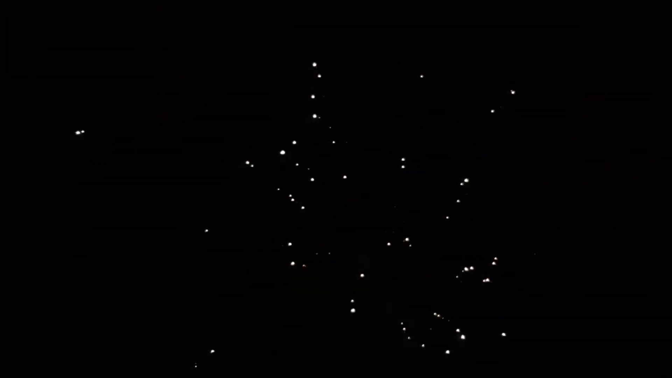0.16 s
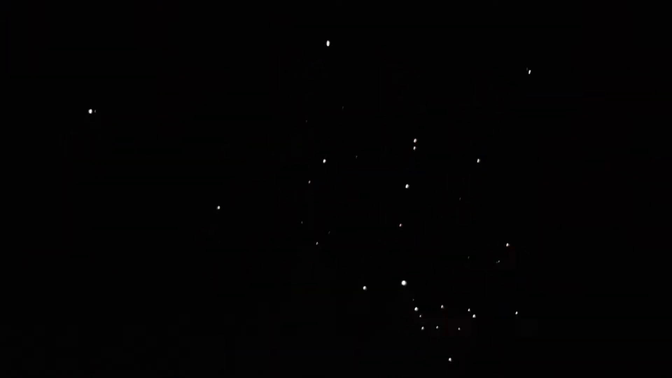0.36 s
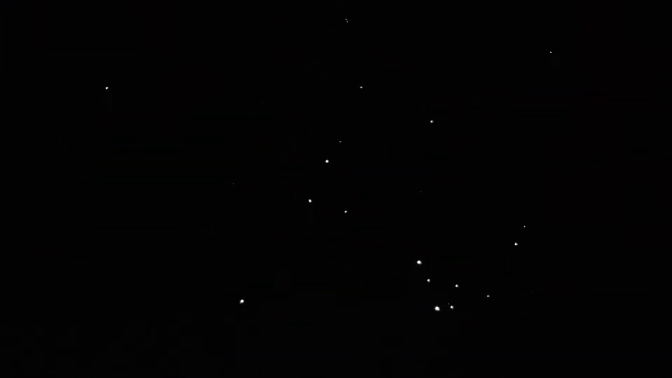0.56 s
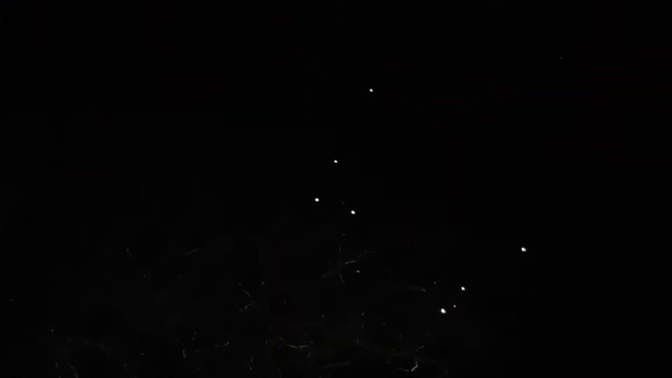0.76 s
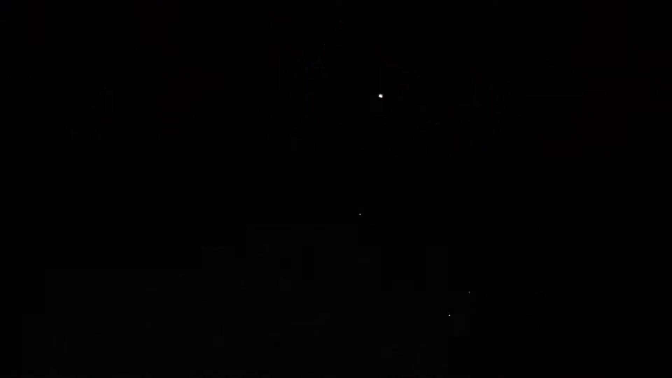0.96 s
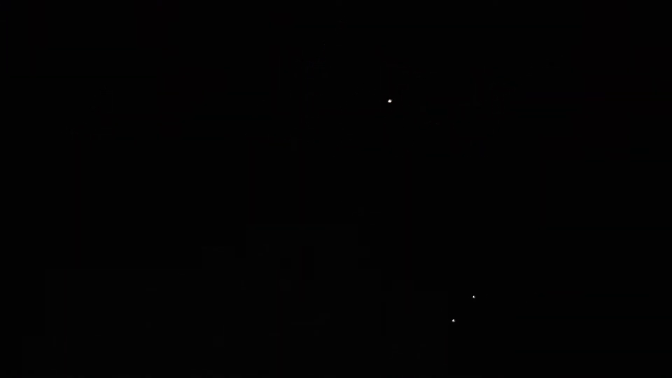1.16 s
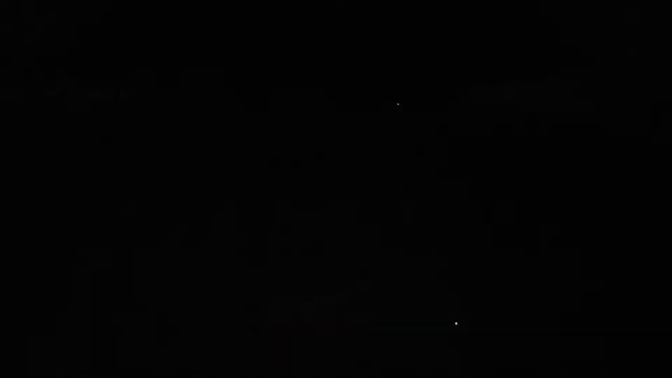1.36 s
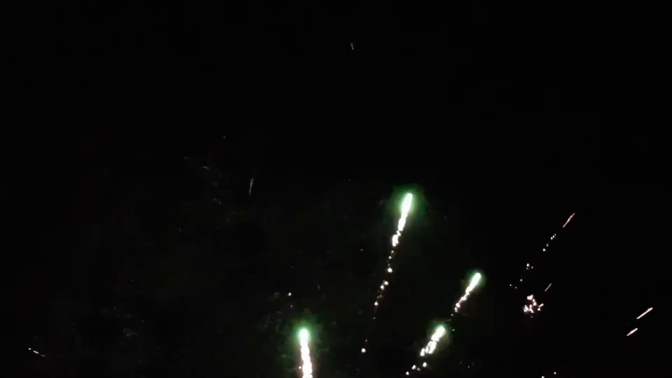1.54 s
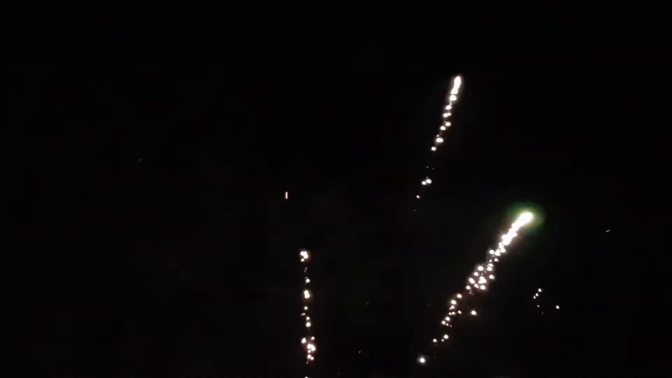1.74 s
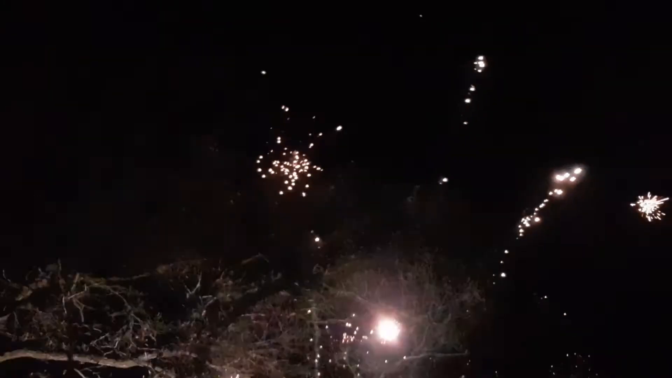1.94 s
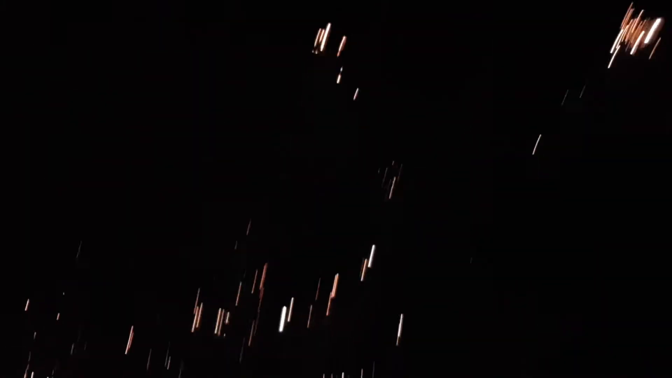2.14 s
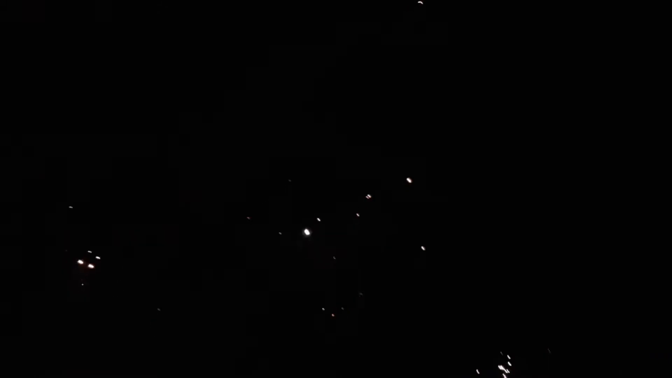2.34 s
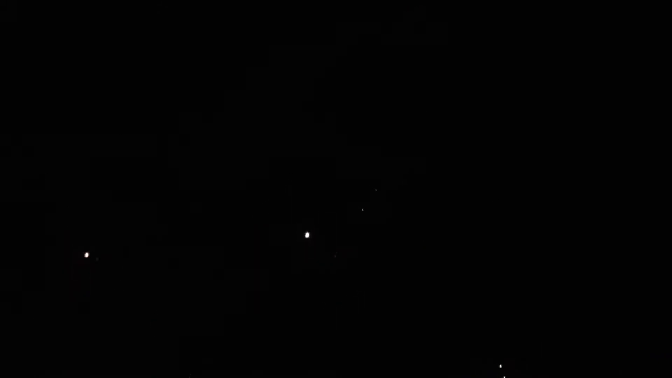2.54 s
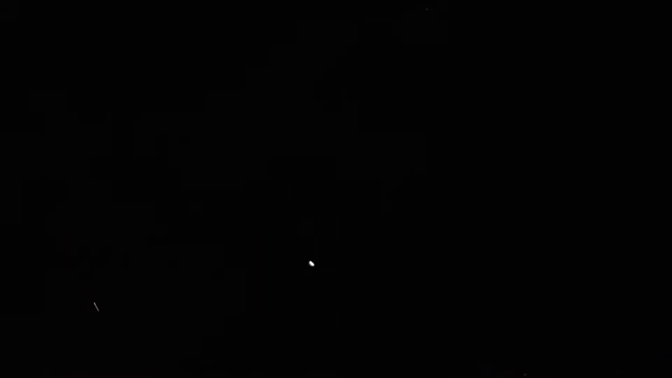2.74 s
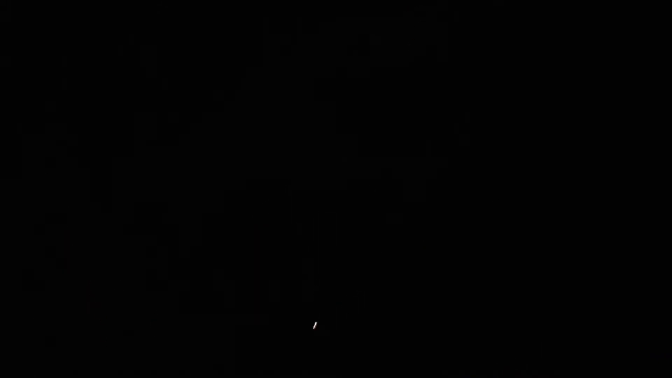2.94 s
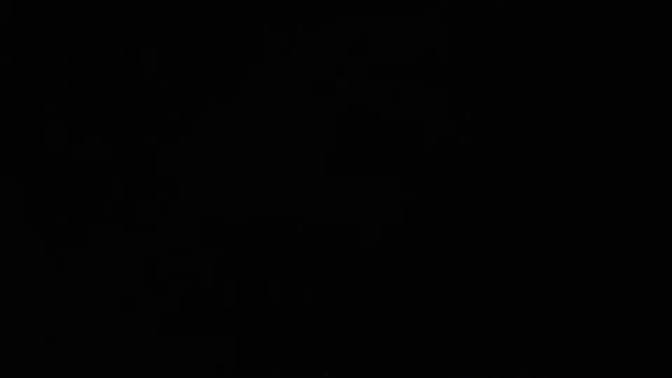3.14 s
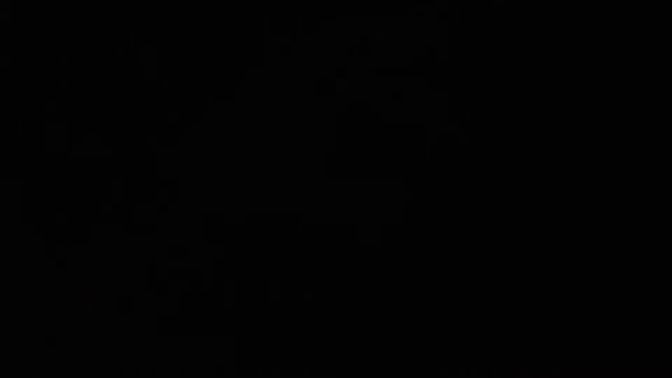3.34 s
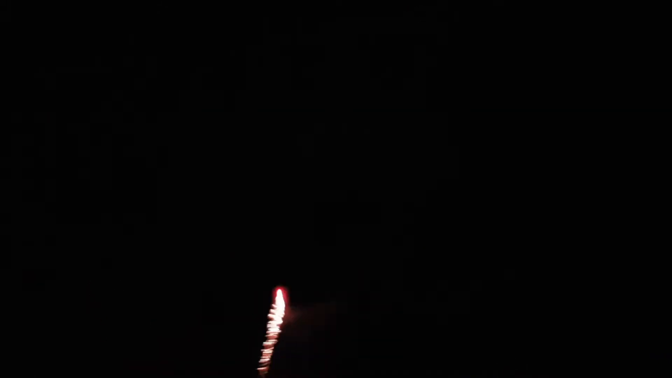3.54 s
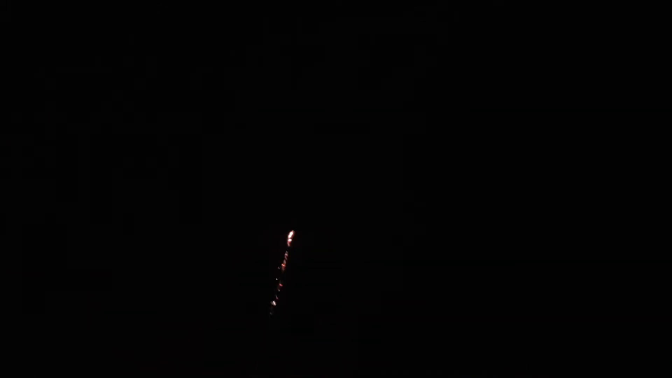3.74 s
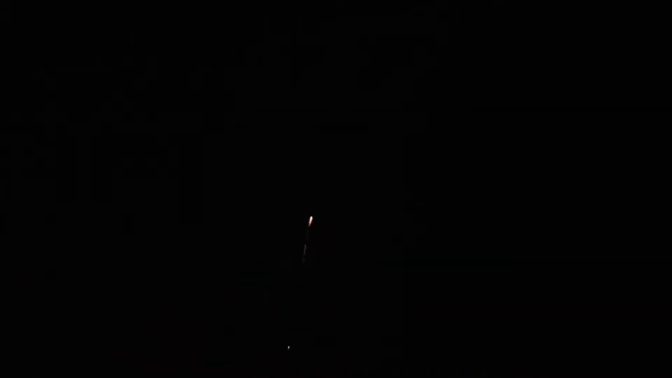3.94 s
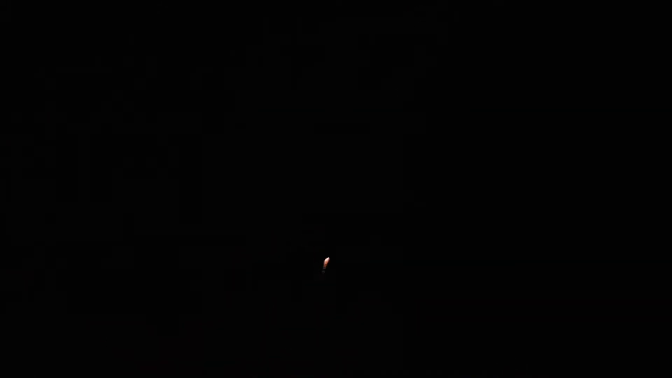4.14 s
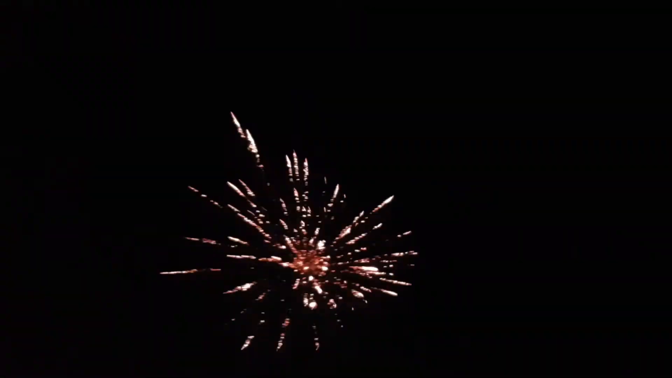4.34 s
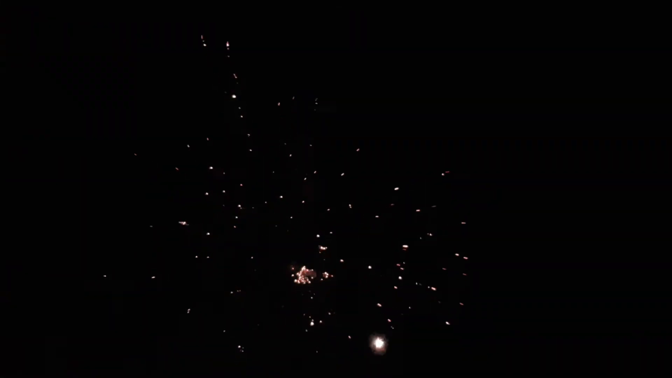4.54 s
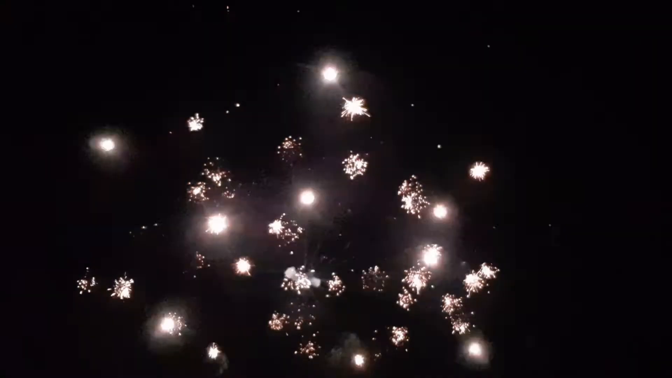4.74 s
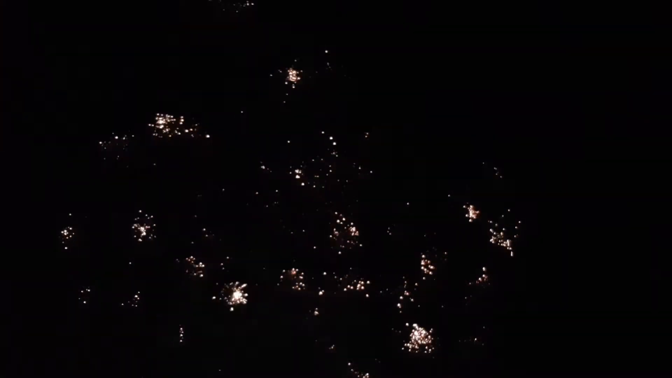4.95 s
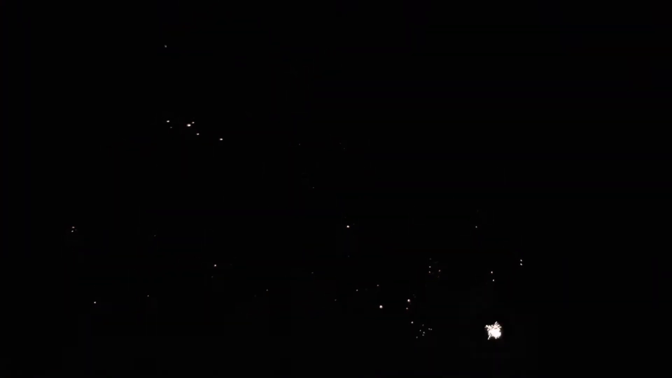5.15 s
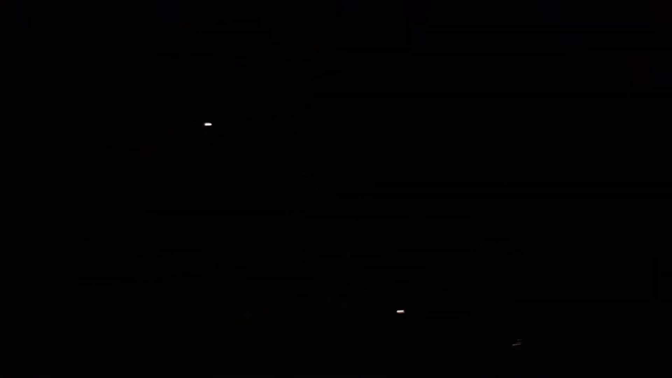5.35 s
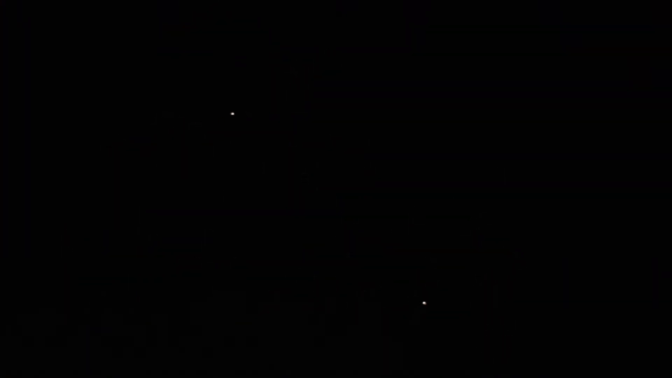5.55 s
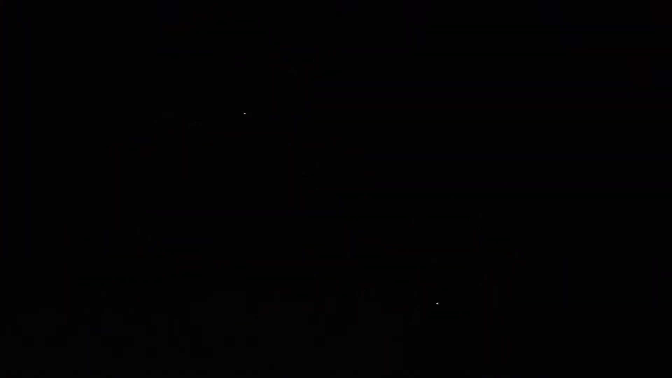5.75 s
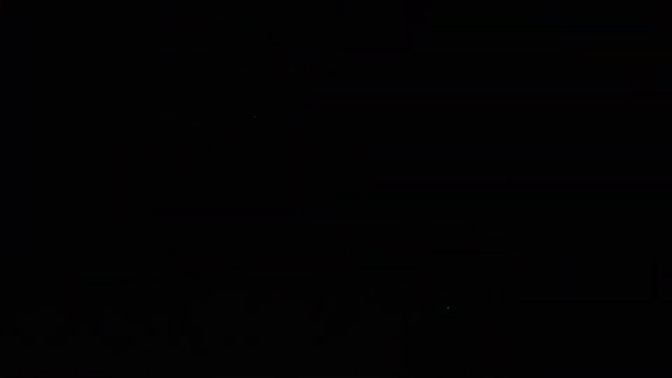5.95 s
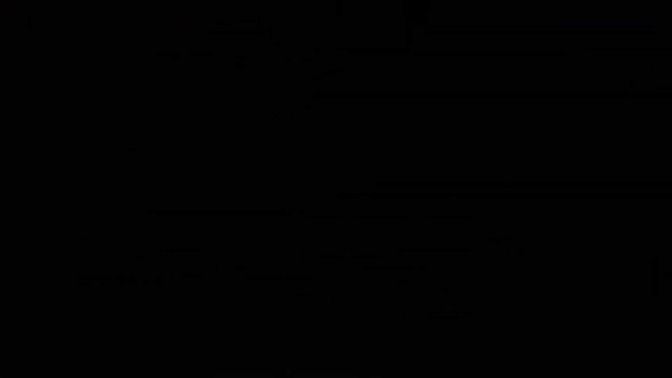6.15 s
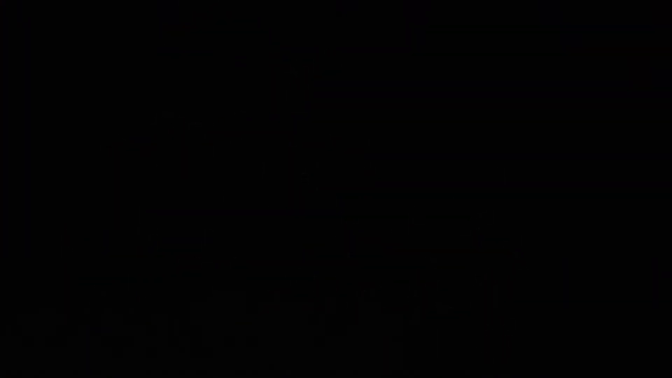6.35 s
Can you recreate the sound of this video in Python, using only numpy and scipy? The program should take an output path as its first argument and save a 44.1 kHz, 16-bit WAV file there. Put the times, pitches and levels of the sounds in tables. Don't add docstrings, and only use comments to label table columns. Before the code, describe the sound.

At night outdoors, launch thumps lead to two huge firework bangs, each followed by a burst of crackling stars, then another launch crack.

```python
import sys
import numpy as np
from scipy import signal
from scipy.fft import rfft, irfft
from scipy.io import wavfile
from scipy.ndimage import uniform_filter1d

SR = 44100
rng = np.random.default_rng(int(sys.argv[2]) if len(sys.argv) > 2 else 0)


def generate_wav(signal):
    frames = np.transpose(np.atleast_2d(signal))
    scaled = np.clip(frames, -1, 1) * 32767
    pcm = np.round(scaled).astype(np.int16)
    wavfile.write(sys.argv[1], SR, pcm)


def invert_db(x):
    u = np.asarray(x, float) / 20
    return 10 ** u


N = 282240


def unit(x):
    return x / np.sqrt(np.mean(x ** 2) + 1e-20)


def along(points, hz):
    f, value = np.transpose(points)
    return np.interp(np.log(hz + 1), np.log(f + 1), value)


def level_curve(rows, t, fade_db):
    s, db = np.transpose(rows)
    after_end = np.clip(t - s[-1], 0, None)
    return np.where(t < s[0], -200, np.interp(t, s, db) - fade_db * after_end)


def add(out, s, x):
    i = round(s * SR)
    out[..., i:i + x.shape[-1]] += x[..., :N - i]


# (frequency [Hz], left-right likeness [-1 to 1])
LIKENESS = [(60, 1), (130, 0.96), (290, 0.85), (640, 0.51), (1410, -0.15), (3100, -0.011), (6820, 0.021),
            (15000, 0.94)]
# (frequency [Hz], left over right [dB])
SIDE_LEAN = [(60, 4), (110, -2), (200, 2.0), (380, 1.5), (700, 4.5), (1290, 0.5), (2380, -4), (4400, -3),
             (8120, 2), (15000, -8.5)]


def rush(spectrum, size, patchy_db, loss=None):
    hz, t, z = signal.stft(rng.standard_normal((2, size)), SR, nperseg=512)
    patches = uniform_filter1d(rng.standard_normal(z.shape[1:]), size=8, axis=0)
    patches = uniform_filter1d(patches, size=4, axis=1)
    turn = np.arccos(np.clip(along(LIKENESS, hz), -1, 1))[:, None] / 2
    mid, side = z[0] * np.cos(turn), z[1] * np.sin(turn)
    lean = invert_db(along(SIDE_LEAN, hz) / 2)[:, None]
    colour = invert_db(along(spectrum, hz))[:, None]
    colour = colour / np.sqrt(np.mean(colour ** 2))
    if loss:
        colour = colour * invert_db(-along(loss, hz)[:, None] * t)
    pair = np.array([(mid + side) * lean, (mid - side) / lean])
    pair = pair * colour * invert_db(patchy_db * unit(patches))
    return signal.istft(pair, SR, nperseg=512)[1][:, :size]


# (time [s], level [dB])
GAIN = [(0, -48), (.12, -42), (.34, -39), (.62, -35.5), (.98, -41), (1.4, -42), (1.9, -50), (2.35, -53),
        (2.92, -51), (3.4, -45.5), (3.67, -53.5), (4.08, -58.5), (4.33, -60), (5.0, -48.5), (5.31, -51.5),
        (5.63, -46.5), (6.4, -42.5)]
# (frequency [Hz], level [dB per Hz])
RUMBLE = [(71, -30), (120, -2), (177, -6), (246, -3.5), (503, -1), (988, -13.5), (1190, -14), (1860, -17.5),
          (2750, -21), (6240, -46), (7350, -56), (12300, -42.5), (16000, -47)]
# (frequency [Hz], level [dB per Hz])
DEEP = [(20, -38.5), (40, -11), (100, -0.5), (140, -7), (250, -40.5), (400, -120)]
# (time [s], level [dB], hold [s], fade [dB per s], first slap over it [dB])
ROLLS = [
    (0.638, -32.5, 0.0046, 120.5, 2),
    (1.402, -13.5, 0.065, 79.5, -5),
    (3.395, -25, .005, 104.5, 5.5),
    (4.331, -24.5, 0.015, 35.5, 8),
    (6.346, -25.5, 0.0046, 151, 2.5),
]


def far_rumble():
    t = np.arange(N) / SR
    gain = invert_db(level_curve(GAIN, t, fade_db=0))
    town = invert_db(-2.0) * gain * rush(RUMBLE, size=N, patchy_db=1.0)
    shake = sum(invert_db(level_curve([(s, db - 39.5)], t, fade_db=40)) for s, db, *_ in ROLLS)
    deep = (invert_db(-17.5) * gain + shake) * unit(rush(DEEP, size=N, patchy_db=3))
    return town + deep


# (start [s], strongest [s], end [s], level [dB])
MURMURS = [
    (1.41, 1.497, 1.85, -27.5),
    (1.75, 1.98, 2.35, -43.5),
    (4.33, 4.42, 4.77, -33.5),
    (4.65, 4.876, 5.12, -40),
]
# (frequency [Hz], level [dB per Hz])
ROAR = [(100, -34), (300, -15), (500, -2), (700, -1.5), (950, -5.5), (1400, -22), (3000, -30.5),
        (16000, -71)]


def murmurs():
    t = np.arange(N) / SR
    swell = sum(invert_db(db) * np.interp(t, [a, b, c], [0, 1, 0]) ** 1.7 for a, b, c, db in MURMURS)
    return swell * rush(ROAR, size=N, patchy_db=2.0)


# (time [s], level [dB])
FUSE = [
    (.56, -67),
    (.595, -38),
    (.612, -23.5),
    (.623, -14.5),
    (.626, -22),
    (.64, -38.5),
]
# (frequency [Hz], level [dB per Hz])
JET = [(200, -15), (700, -8), (2000, 7), (4500, 2), (8000, -10.5), (16000, -28.5)]


def fuse():
    t = np.arange(N) / SR
    return invert_db(level_curve(FUSE, t, fade_db=599.5)) * rush(JET, size=N, patchy_db=4.0)


# (start [s], end [s], level [dB], fade [dB per s])
TRAILS = [
    (.645, 0.868, -51, 12.5),
    (0.925, 1.368, -55, 18),
    (3.55, 3.763, -62.5, 65),
    (3.75, 4.3, -78, 6),
]
# (frequency [Hz], level [dB per Hz])
FIZZ = [(300, -39.5), (1200, -6.5), (2500, -3), (5000, -4), (9000, -10), (12000, -8.5), (16000, -10)]


def trails():
    t = np.arange(N) / SR
    burn = np.zeros(N)
    for a, b, db, fade in TRAILS:
        spell = [(a, db), (b, db - fade * (b - a))]
        burn += invert_db(level_curve(spell, t, fade_db=303.5) + 3.5)
    flicker_s = .04
    burn = uniform_filter1d(burn, size=round(flicker_s * SR))
    return burn * rush(FIZZ, size=N, patchy_db=1.2)


# (frequency [Hz], time to fall 60 dB [s])
YARD = [(150, 0.93), (600, 0.7), (2500, 1), (5000, 0.93), (8000, 0.7), (16000, 0.1)]
# (time [s], echo level [dB])
WET = [
    (1.8, -8),
    (2.1, -13.5),
    (2.6, -18),
    (4.7, -9.5),
    (5.05, -11.5),
    (5.8, -3.5),
]


def yard(crackle):
    hz, t, z = signal.stft(rng.standard_normal((2, SR)), SR, nperseg=256)
    tail = signal.istft(z * invert_db(-60 * t / along(YARD, hz)[:, None]), SR, nperseg=256)[1]
    echo = signal.fftconvolve(crackle, tail / np.linalg.norm(tail[0]), axes=1)[:, :N]
    return invert_db(np.interp(np.arange(N) / SR, *np.transpose(WET))) * echo


# (frequency [Hz], level [dB per Hz])
LIFT_ECHO = [(24, -40.5), (40, -10.5), (140, 4), (491, -11), (646, -20), (810, -4.5), (965, -4), (3830, -7),
             (11600, -21), (16000, -27)]
# (frequency [Hz], level [dB per Hz])
SHELL_ECHO = [(24, -64), (40, -35), (297, -4), (444, -5.5), (585, -4), (1410, -12), (2100, -8.5),
              (3830, -13.5), (14800, -29), (16000, -45)]
# (frequency [Hz], level [dB per Hz])
HIGH_ECHO = [(24, -60.5), (40, -16), (189, -9.5), (329, -7.5), (630, -7), (1210, -13.5), (2840, -14),
             (16000, -31)]
# (frequency [Hz], loss [dB per s])
AIR_LOSS = [(60, 60.5), (150, 26), (500, -7), (1500, -1), (4000, 5), (8000, 38.5), (15000, 57)]
# (delay [s], level over the roll [dB])
WALL_RETURNS = [
    (.045, -6.5),
    (.064, -5),
    (.1, -6.5),
]


def rolls():
    out, t = np.zeros((2, N)), np.arange(SR * 3 // 2) / SR
    lead = .005
    swell, age = 1 - np.exp(-t / 0.0059), np.clip(t - lead, 0, None)
    walls = 1 + sum(invert_db(db) * np.exp(-((age - delay) / 0.0064) ** 2) for delay, db in WALL_RETURNS)
    echoes = (LIFT_ECHO, SHELL_ECHO, LIFT_ECHO, HIGH_ECHO, LIFT_ECHO)
    ways = (1, 1, 1, 1.4, 1)
    for (start, db, hold, fade, slap_db), spectrum, way in zip(ROLLS, echoes, ways):
        slap = invert_db(slap_db - 990 * age)
        body = invert_db(-fade * np.clip(age - hold, 0, None))
        farthest = invert_db(-24.5 - 43 * age)
        loss = [(hz, way * db_per_s) for hz, db_per_s in AIR_LOSS]
        noise = rush(spectrum, size=len(t), patchy_db=1.2, loss=loss)
        add(out, start - lead, swell * invert_db(db) * (slap + body + farthest) * walls * noise)
    return out


# (start [s], densest [s], end [s], peak [dB], sizzle [dB])
SWARMS = [
    (1.831, 2.0, 2.1, -19.5, -2),
    (2.059, 2.1, 2.26, -33.5, 0),
    (4.7, 4.87, 5.045, -21, -9),
]
# (time [s], peak [dB], left over right [dB], sizzle [dB])
STRAYS = [(1.08, -47, 1, 8), (1.69, -28, -2, -2), (1.763, -25, -2, 2.5), (2.1487, -24, -3, -1),
          (2.1899, -24, -1, -9), (2.2296, -20, -5, 5), (2.2343, -21, -4, -3), (2.997, -56, 0, 0),
          (4.08, -55, 0, -4), (4.112, -58, 0, -12), (4.682, -27, 0, -3), (4.692, -22, 0, -2),
          (5.2912, -17.5, 0, -8), (5.2993, -21, 2, -10), (5.657, -48, 1, -4)]
# (time [s], peak [dB], left over right [dB])
LOW_STARS = [(1.7951, -9, -2), (1.8017, -11, -2), (1.8279, -6.5, -4), (1.8361, -7, -3), (1.8518, -6, -5),
             (1.8602, -12, -1), (1.8878, -13, -1), (1.8929, -11, -6), (1.899, -10, -5), (1.9136, -13, -4),
             (1.9185, -12, 0), (1.9354, -7, 6), (1.9381, -12, -4), (1.9441, -10, -4), (1.9474, -7, -5),
             (1.9744, -10, -3), (1.9769, -11, -3), (1.9804, -10, -1), (1.9827, -10, -3), (1.9985, -10, -4),
             (2.0015, -8, -1), (2.0078, -8, -6), (2.0203, -13, -2), (2.0279, -9, -7), (2.0565, -13, -1),
             (2.0651, -13, -2), (2.0706, -10, -3), (2.0785, -11, -3), (2.1148, -17, 4), (2.1238, -16, 4)]
# (time [s], peak [dB], left over right [dB])
HIGH_STARS = [(4.705, -17, -1), (4.7395, -18, -2), (4.7481, -15, -1), (4.7539, -19, 2), (4.7586, -20, 0),
              (4.7945, -20, 1), (4.8084, -13, 0), (4.8179, -19, 1), (4.8282, -14, -3), (4.8373, -16, -1),
              (4.8439, -13, 1), (4.8479, -12, 1), (4.8666, -17, -1), (4.8801, -16, -4), (4.8848, -15, 2),
              (4.8882, -15, 1), (4.8906, -15, -1), (4.9003, -18, -1), (4.914, -17, 4), (4.9275, -15, -3),
              (4.9363, -17, -2), (4.9484, -11, 0), (4.9599, -14, 5), (4.9856, -20, 1), (4.9949, -16, -2),
              (5.0064, -16, -4), (5.0163, -18, 2), (5.0302, -15, -2), (5.0399, -21, -3)]


def all_stars():
    rows = [STRAYS]
    for a, b, c, db, sizzle_db in SWARMS:
        count = 170
        when = rng.triangular(a, b, c, size=count)
        peak_db = db - 7 * rng.exponential(size=count)
        pan_db = rng.normal(-1, 2.5, size=count)
        rows.append(np.c_[when, peak_db, pan_db, np.full(count, sizzle_db)])
    for loud, sizzle_db in ((LOW_STARS, -5.5), (HIGH_STARS, -11)):
        rows.append(np.c_[loud, np.full(len(loud), sizzle_db)])
    return np.vstack(rows)


def stars():
    s, db, pan_db, sizzle_db = all_stars().T[:, :, None]
    lag, spread, pitch = rng.standard_normal((len(s), 3)).T[:, :, None]
    sizzle_db = sizzle_db + 3 * spread
    hz = 3250 * np.exp(.12 * pitch)
    lag_s = .00017 * lag
    t = np.arange(256) / SR
    out = np.zeros((2, N))
    for port, side in zip(out, (.5, -.5)):
        cycles = t * hz * np.exp(0.2 * rng.standard_normal(s.shape))
        weak_ring = 0.12 * invert_db(-60 * t / 0.00071)
        shock = np.sin(2 * np.pi * cycles) * np.where(cycles < 1, 1, weak_ring)
        slow_blast = 0.85 * np.sin(2 * np.pi * 600 * t) * invert_db(-60 * t / 0.0014)
        grit = rng.standard_normal((len(s), 256))
        dulling = np.where(s < 4.5, .15, .95)
        grit = grit + dulling * np.roll(grit, 1, axis=1)
        pop = shock + slow_blast + invert_db(sizzle_db - 2.5 - 60 * t / 0.005) * grit
        pop = invert_db(db + side * pan_db + 2.34) * pop / np.abs(pop).max(axis=1, keepdims=True)
        where = np.round((s + side * lag_s - .5 / hz) * SR).astype(int) + np.arange(256)
        port += np.bincount(where.ravel(), pop.ravel(), N)[:N]
    return signal.sosfilt(signal.butter(2, 170, "high", fs=SR, output="sos"), out)


# (time [s], level [dB], rise [s], pitch [Hz])
PUFFS = [
    (3.272, -50, 0.0054, 120),
    (3.376, -26, 0.0053, 500),
    (6.328, -24.5, 0.0037, 503),
]


def puffs():
    out, t = np.zeros((2, N)), np.arange(SR // 10) / SR
    for s, db, rise, hz in PUFFS:
        shape = np.exp(-np.abs(t - .03) / rise)
        colour = [(hz / 3, -12), (hz, 0), (hz * 6, -14), (5000, -34), (10000, -70)]  # (Hz, dB per Hz)
        add(out, s - .03, invert_db(db) * shape * rush(colour, size=len(t), patchy_db=2))
    return out


# (time [s], crack [dB], thump [dB], thump pitch [Hz], thump length [s])
LIFTS = [
    (.624, -7, -4.5, 195, .0042),
    (3.3845, -5, -10, 162, .009),
    (6.336, -3, -16, 158, .011),
]


def lifts():
    out, t = np.zeros((2, N)), np.arange(SR // 10) / SR
    lean_db = -3.5
    lean = invert_db([[lean_db / 2], [-lean_db / 2]])
    for s, crack_db, thump_db, hz, length in LIFTS:
        spike = invert_db(-60 * t / .0014) * np.sin(2 * np.pi * np.array([[4500], [3700]]) * t + .9)
        ground = .65 * np.roll(spike, round(.00063 * SR), axis=1)
        spit = 0.52 * invert_db(-60 * t / 0.0082) * uniform_filter1d(rng.standard_normal((2, len(t))), size=2)
        crack = invert_db(crack_db) * (spike + ground + spit)
        thump = -invert_db(thump_db) * np.exp(-(t / length) ** 1.5) * np.sin(2 * np.pi * hz * t - .7)
        add(out, s - .00005, crack * lean + thump)
    return out


# (time [s], signed swing [full scale], pitch [Hz])
WALLS = [(.5977, .07, 300), (1.4305, -.45, 600), (3.3762, .1, 300), (3.3992, -.25, 1200),
         (3.4065, .08, 200), (4.342, .17, 600), (4.3525, .2, 500), (4.3578, -.33, 450), (4.372, -.18, 450),
         (6.3476, -.12, 1300), (6.3505, -.18, 1400), (6.357, .08, 1300)]


def wall_pulses():
    out = np.zeros((2, N))
    near = (np.arange(400) - 200) / SR
    for s, swing, hz in WALLS:
        pulse = swing * np.cos(2 * np.pi * hz * near) * np.exp(-(1.8 * hz * near) ** 2)
        add(out, s + near[0], pulse * [[1.1], [.9]])
    return out


# (time [s], signed swing [full scale], pitch [Hz], time to fall 60 dB [s], rattle [dB])
LEFT_FRONTS = [
    (1.3872, 1.9, 720, .011, -5),
    (1.3936, 1.7, 430, .013, -12),
    (1.3941, -.6, 150, .015, -30),
    (4.3173, .9, 2500, .002, -6),
    (4.3176, -1.2, 150, .01, -14),
    (4.3175, .3, 45, .05, -40),
    (4.3272, 1.9, 500, .011, -14),
]
# (time [s], signed swing [full scale], pitch [Hz], time to fall 60 dB [s], rattle [dB])
RIGHT_FRONTS = [
    (1.3871, 1.3, 3300, .0015, -30),
    (1.3873, 1.1, 140, .016, -40),
    (1.3935, -2.4, 105, .014, -40),
    (1.3935, .4, 30, .08, -40),
    (4.3171, 1, 2800, .002, -20),
    (4.3173, -1.4, 140, .011, -40),
    (4.3173, .3, 25, .08, -40),
    (4.327, 1.8, 500, .011, -16),
]


def shells():
    out, t = np.zeros((2, N)), np.arange(SR // 20) / SR
    for port, fronts in zip(out, (LEFT_FRONTS, RIGHT_FRONTS)):
        for s, swing, hz, t60, rattle_db in fronts:
            membrane = swing * invert_db(-60 * t / t60) * np.cos(2 * np.pi * hz * t)
            rattle = uniform_filter1d(rng.standard_normal(len(t)), size=3) * invert_db(rattle_db - 60 * t / 0.017)
            add(port, s, membrane + rattle)
    return out


def scene():
    crackle = stars()
    background = far_rumble() + murmurs() + fuse() + trails()
    rest = background + yard(crackle) + rolls() + crackle
    rest = signal.sosfilt(signal.butter(2, 55, "high", fs=SR, output="sos"), rest)
    thumps = signal.sosfilt(signal.butter(1, 35, "high", fs=SR, output="sos"), puffs() + lifts())
    return rest + thumps + wall_pulses() + shells()


def roll_off(x):
    return signal.sosfilt(signal.butter(12, 16650, fs=SR, output="sos"), x)


def record(dry):
    clipped = dry / (1 + np.abs(dry / .97) ** 8) ** (1 / 8)
    above_top = np.clip((np.fft.rfftfreq(N, 1 / SR) - 15850) / 200 + .5, 0, 1)
    mix = irfft(rfft(clipped) * invert_db(-22 * above_top), N)
    return roll_off(mix)


dry = scene()
out = record(dry)
generate_wav(out)
```